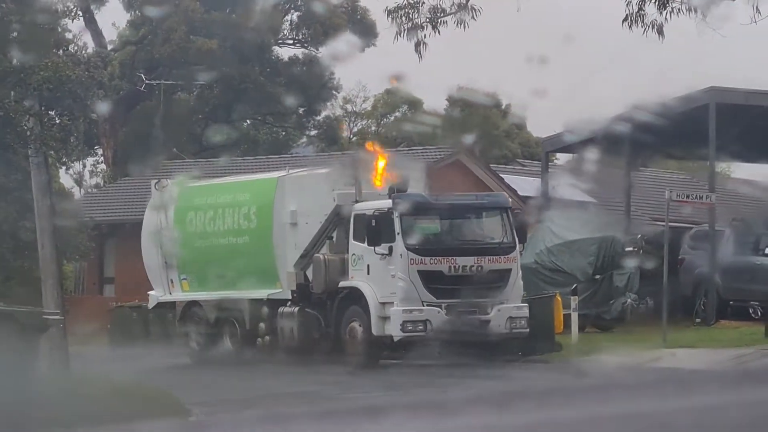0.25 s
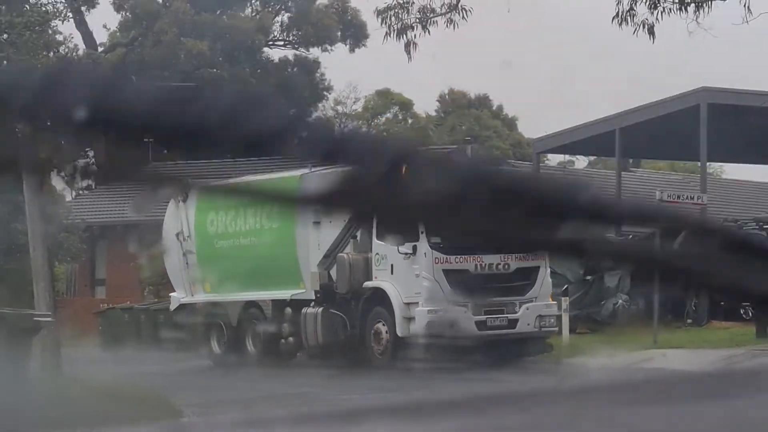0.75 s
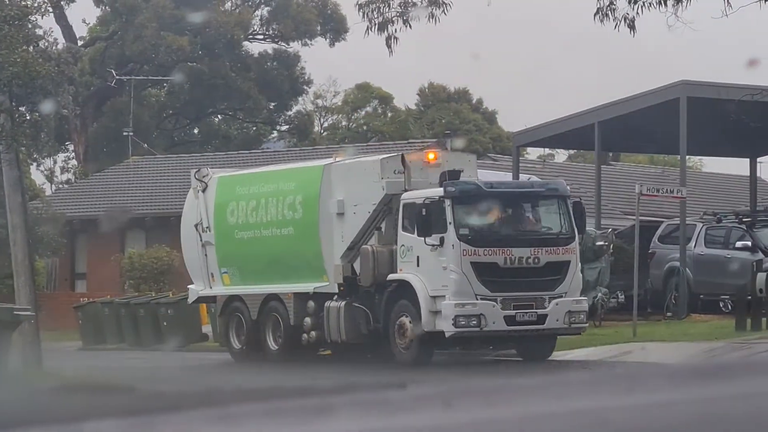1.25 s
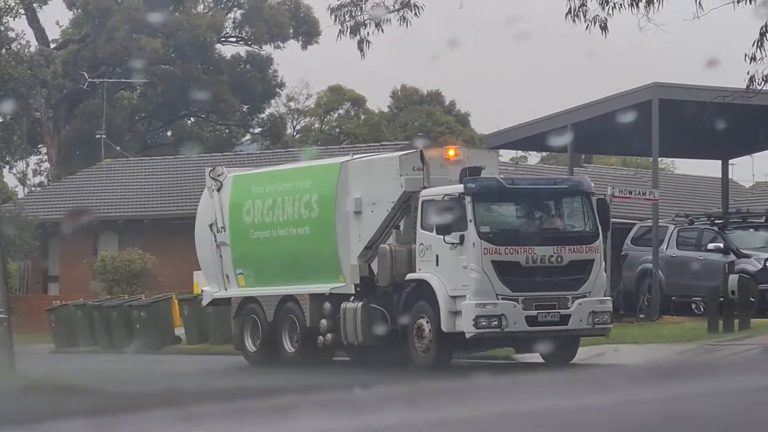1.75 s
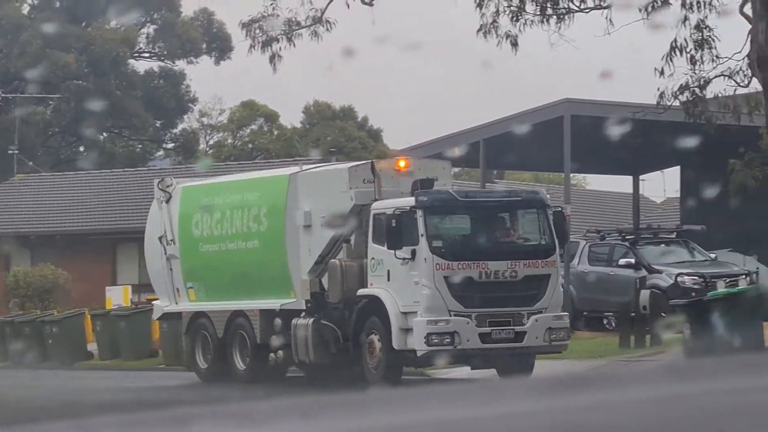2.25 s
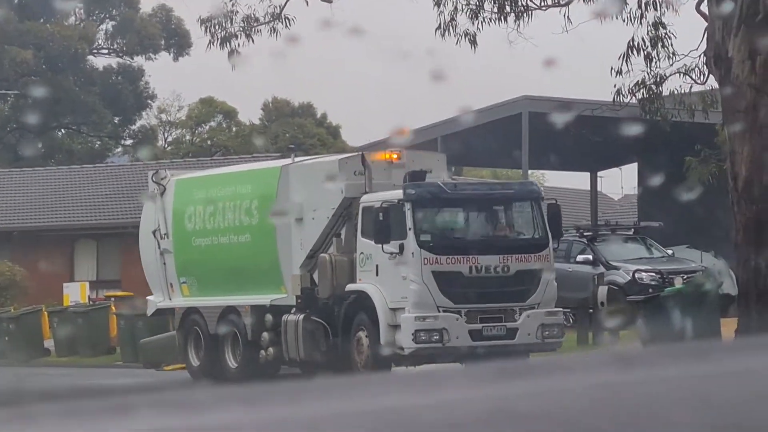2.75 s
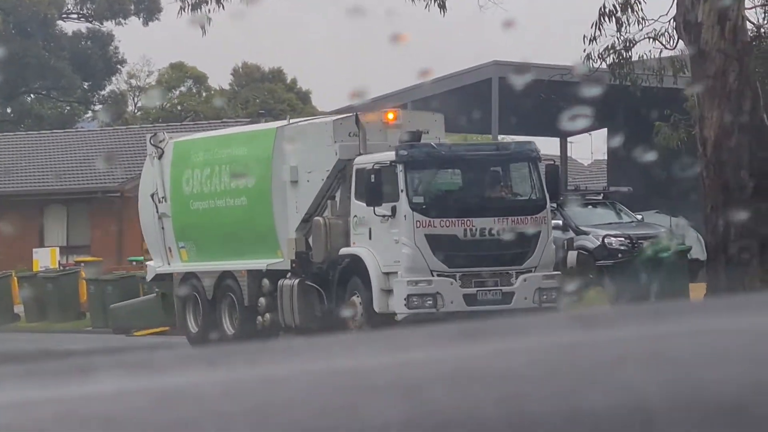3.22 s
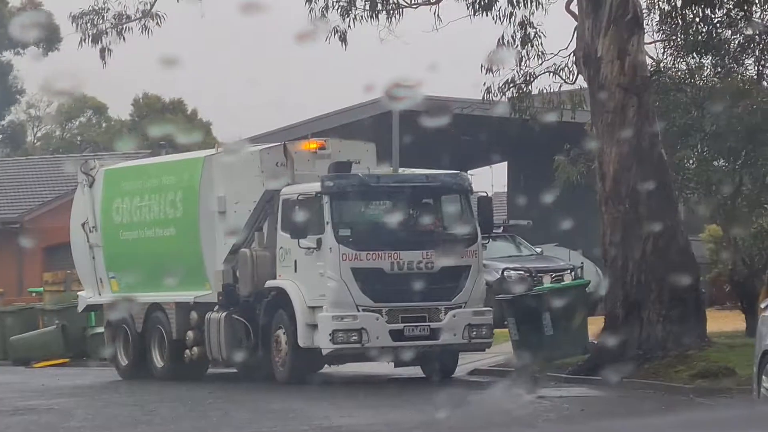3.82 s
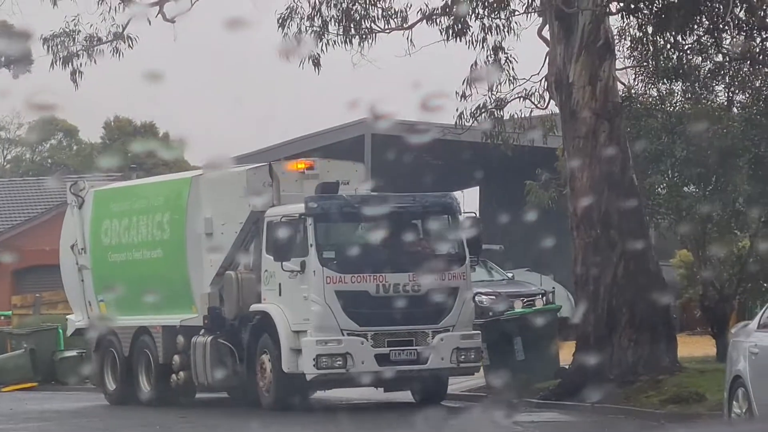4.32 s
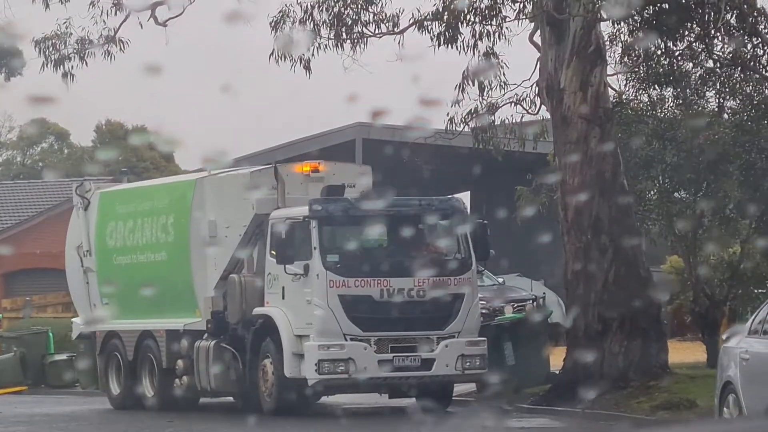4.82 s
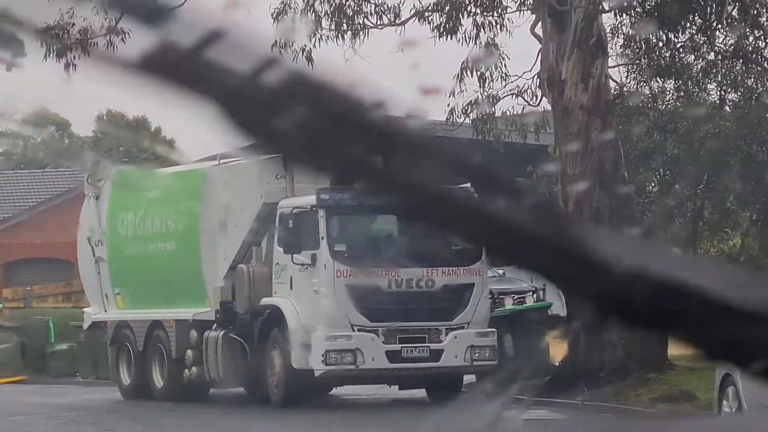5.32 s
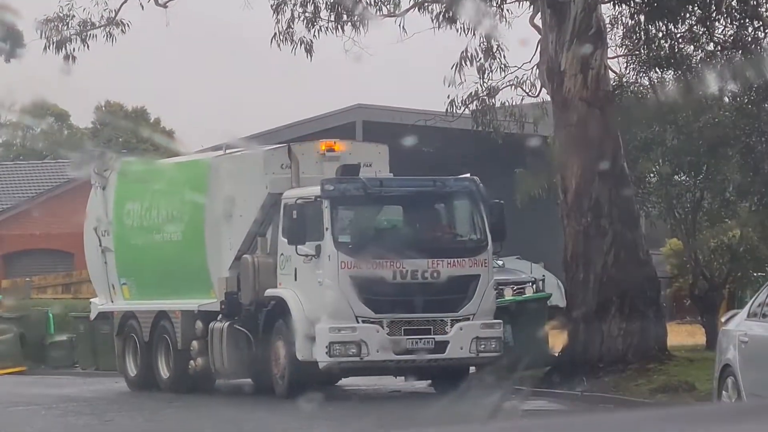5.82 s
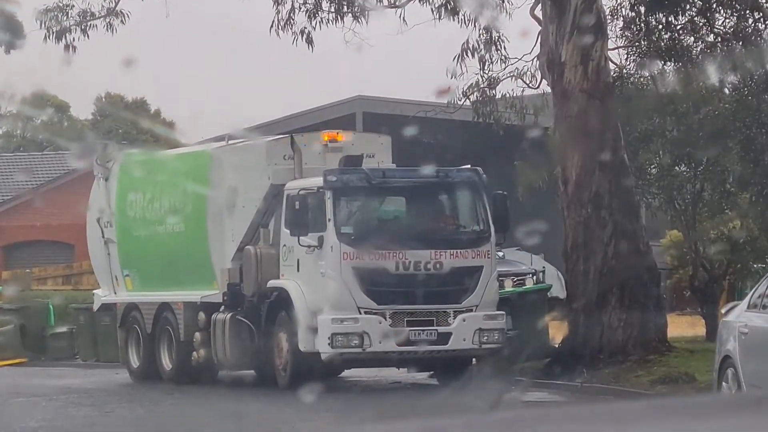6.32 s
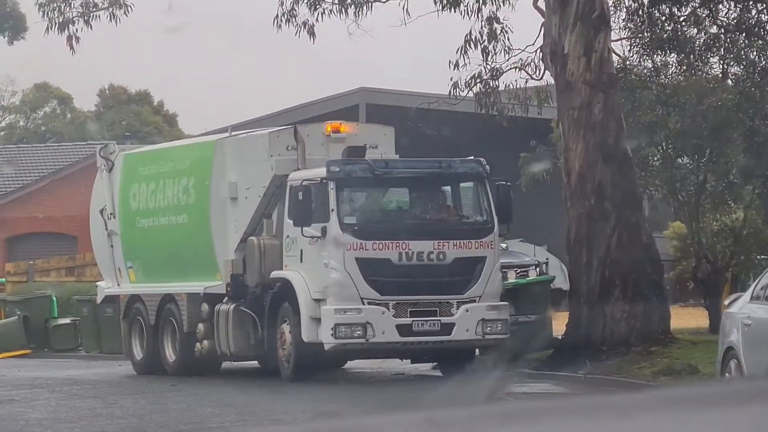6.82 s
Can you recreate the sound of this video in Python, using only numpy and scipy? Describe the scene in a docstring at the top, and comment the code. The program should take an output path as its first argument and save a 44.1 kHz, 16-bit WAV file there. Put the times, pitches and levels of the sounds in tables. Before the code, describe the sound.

Wet wiper rubber judders and groans across a windscreen twice, with dull thuds, over steady rain patter and low engine rumble inside a slowly creeping car.

```python
"""Two wiper sweeps judder, groan and rasp up the windscreen of a car creeping through steady rain.
The rubber sticks and slips, its lip sings gliding notes, and the blade frame rings; low thuds go with it.
After the first sweep the blade skips and glides back softly, as muffled filtered noise.
Rain is a grainy patter, hiss and ringing drops; engine and road are coloured noise, the brake faint sines.
Once, a plastic part clicks in the cabin: two decaying noise bursts through a few resonances."""
import sys
import numpy as np
from scipy import signal
from scipy.fft import rfft, irfft, next_fast_len
from scipy.io import wavfile
from scipy.ndimage import uniform_filter1d, map_coordinates

SR = 44100
rng = np.random.default_rng(int(sys.argv[2]) if len(sys.argv) > 2 else 0)


def store_wav(level_fs):
    """Save 16-bit WAV to argv[1]."""
    pcm = np.round(np.clip(np.atleast_2d(level_fs), -1, 1) * 32767)
    wavfile.write(sys.argv[1], SR, pcm.T.astype(np.int16))


N = 311346

# How alike left and right are in the open sound of the cabin. Each row: frequency in Hz, likeness (1 is mono).
CABIN_ALIKE = [(60, 1), (240, 0.89), (950, 0.29), (3770, -0.095)]
# Resonances of the blade frame. Each row: frequency in Hz, width in Hz, gain at the peak in dB.
FRAME_MODES = [(606, 25, 6.5), (737, 28, 7), (989, 35, 7.5), (1105, 24, 6.5), (1510, 96, 8),
               (1778, 17, 5.5), (2160, 22, 5), (3120, 76, 4)]
JUDDER_FALL_DB_PER_S, RASP_FALL_DB_PER_S = 328.5, 680  # how fast the rubber lets go


def amp(db):
    """Decibels to gain."""
    return 10 ** (np.asarray(db) / 20)


def unit(x):
    """Scale to rms 1."""
    return x / np.sqrt(np.mean(x ** 2) + 1e-20)


def along(points, hz):
    """Read (Hz, value) points on a logarithmic frequency axis."""
    f, v = np.transpose(points)
    return np.interp(np.log(hz + 1), np.log(f + 1), v)


def curves(rows):
    """One value per sample for each column after the time."""
    s, *cols = np.transpose(rows)
    return [np.interp(np.arange(N) / SR, s, c) for c in cols]


def gate(rows):
    """One while a table lasts, with soft edges."""
    t = np.arange(N) / SR
    inside = (t >= rows[0][0]) & (t <= rows[-1][0])
    return uniform_filter1d(1. * inside, size=400)


def wobble(rate):
    """A smooth random curve, rate knots a second."""
    knots = rng.standard_normal(int(N * rate / SR) + 4)
    return map_coordinates(knots, [np.arange(N) * rate / SR])


def filtered(x, response):
    """Filter x by a response given as a function of frequency in Hz."""
    m = next_fast_len(N + SR // 2)
    return irfft(rfft(x, m) * response(np.fft.rfftfreq(m, 1 / SR)), m)[..., :N]


def causal(spectrum):
    """Minimum-phase impulse response of (Hz, dB) points, energy 1."""
    size = 4096
    gain = amp(along(spectrum, np.fft.rfftfreq(size, 1 / SR)))
    cepstrum = irfft(np.log(gain + 1e-6))
    # fold the cepstrum forward in time
    cepstrum[1:size // 2] *= 2
    cepstrum[size // 2 + 1:] = 0
    h = irfft(np.exp(rfft(cepstrum)))
    return h / np.linalg.norm(h)


def colour(pair, spectrum, alike):
    """A pair of excitations becomes coloured stereo of rms 1, its width set by the likeness table."""
    body = signal.fftconvolve(pair, causal(spectrum)[None], axes=1)[:, :N]

    def mid_side_gains(hz):
        turn = np.arccos(np.clip(along(alike, hz), -1, 1)) / 2
        return np.array([np.cos(turn), np.sin(turn)])

    mid, side = filtered(body, mid_side_gains)
    return unit(np.array([mid + side, mid - side]))


def noise():
    """Two channels of white noise."""
    return rng.standard_normal((2, N))


def grains(rate, spread_db, t60):
    """Randomly timed tiny bursts of uneven size, rate a second, decaying 60 dB in t60 seconds."""
    hits = rng.random(N) < rate / SR
    sizes = hits * amp(spread_db * np.minimum(rng.exponential(size=N), 4))
    power = signal.lfilter([1], [1, -amp(-120 / (t60 * SR))], sizes ** 2)
    return unit(noise() * np.sqrt(power))


def pan(db):
    """Left and right gains for a left-minus-right level difference."""
    return amp(np.array([[db], [-db]]) / 2)


def add(track, s, sound):
    """Mix a sound in at time s."""
    part = track[..., max(round(s * SR), 0):][..., :sound.shape[-1]]
    part += sound[..., :part.shape[-1]]


def swell(s, db, length):
    """A bell-shaped rise and fall around time s, down to 1/e at length seconds either side."""
    return amp(db) * np.exp(-((np.arange(N) / SR - s) / length) ** 2)


def burst(s, hold, db, fall_db_per_s):
    """A quick attack up to time s, a hold, then an even fall in dB."""
    attack_s = 0.014
    t = np.arange(N) / SR - s
    attack = np.clip(1 + t / attack_s, 0, 1)
    return attack * amp(db - np.clip(fall_db_per_s * (t - hold), 0, 200))


def ringing(x, resonances):
    """A part passes everything and rings at a few resonances."""
    def response(hz):
        total = 1
        for centre, width, db in resonances:
            damping = 1j * hz * width
            total = total + (amp(db) - 1) * damping / (centre * centre - hz * hz + damping)
        return total

    return filtered(x, response)


def grip(fall_db_per_s, axis):
    """Envelope of all the rubber's grabs at the glass for one level column; the strongest rules."""
    # Each row: start in seconds, hold in seconds, judder in dB, rasp in dB, both before the frame rings.
    grabs = [(0.002, 0.04, -20, -23.5), (0.052, .05, -20, -23), (0.154, 0.011, -17.5, -31),
             (0.244, .012, -32, -46), (5.033, 0.045, -41, -67.5), (5.109, 0.13, -17.5, -35.5),
             (5.262, .028, -22, -39.5), (5.314, 0.04, -19.5, -35), (5.418, 0.012, -21.5, -31.5),
             (5.49, 0.0094, -21, -33.5), (5.571, 0.028, -33, -43), (5.634, 0.11, -30, -39),
             (5.735, 0.096, -22, -26.5), (5.855, .045, -20, -26.5), (5.94, 0.024, -22, -40.5),
             (6.036, 0.01, -35, -60)]
    return np.max([burst(row[0], row[1], row[axis], fall_db_per_s) for row in grabs], axis=0)


def slips(rate, scatter, size_db, t60, grit):
    """Stick-slip: each release is a kick followed by a short scuff."""
    turns = np.cumsum(rate * np.exp(scatter * wobble(120))) / SR
    kicks = np.diff(np.floor(turns), prepend=0) * amp(size_db * rng.random(N))
    decay = signal.lfilter([1], [1, -amp(-60 / (t60 * SR))], kicks)
    return grit * unit(noise() * decay) + unit(kicks)


def blade():
    """Rubber judders on the glass and rasps where it grips hardest; both set the blade frame ringing."""
    # Tone of the juddering rubber. Each row: frequency in Hz, level in dB.
    rubber_tone = [(50, -19.5), (100, 5), (150, -14), (183, 0.5), (220, -4.5), (290, -4), (380, -9),
                   (900, -25.5), (1400, -32.5), (3000, -77)]
    # Tone of the rasp. Each row: frequency in Hz, level in dB.
    rasp_tone = [(400, -7), (750, -2), (1600, -4.5), (2100, -10.5), (3100, -11.5), (4300, -24), (5400, -20),
                 (8000, -40), (14000, -61)]
    # Left-right likeness of the blade. Each row: frequency in Hz, likeness (1 is mono).
    blade_alike = [(100, 1), (300, 0.92), (600, 0.45), (1100, 0.028)]
    # Which side the rasp leans to. Each row: frequency in Hz, left minus right in dB.
    rasp_lean = [(1300, -1.5), (2400, -5.5), (4400, -9.5)]
    judder = slips(rate=105, scatter=.4, size_db=3.5, t60=0.069, grit=1.87)
    judder = colour(judder, rubber_tone, blade_alike)
    rasp = slips(rate=250, scatter=.25, size_db=3, t60=.02, grit=1.1)
    rasp = colour(rasp, rasp_tone, blade_alike)
    rasp = filtered(rasp, lambda hz: pan(along(rasp_lean, hz))[:, 0])
    rasp = amp(-4) * unit(rasp * amp(wobble(110)))  # an unsteady level
    gripped = grip(JUDDER_FALL_DB_PER_S, axis=2) * judder
    gripped = gripped + grip(RASP_FALL_DB_PER_S, axis=3) * rasp
    return ringing(gripped, FRAME_MODES)


def groan(count=11):
    """The rubber lip locks into gliding notes; a harder grip brings out overtones that ring the frame."""
    # Each row: start in seconds, length in seconds, starting pitch in Hz, glide in Hz per second, level in dB.
    groans = [(0, .11, 276.8, 199, -17.5), (5.143, 0.043, 334, 0, -20.5), (5.389, 0.079, 379, -100, -29.5),
              (5.481, 0.024, 302, 405, -18), (5.519, 0.046, 413, -700, -29.5),
              (5.561, 0.067, 328, -480, -23.5), (5.631, .08, 305.4, 329, -22.5),
              (5.722, .19, 262.1, -90, -24), (5.635, .07, 850, -150, -34.5),
              (5.679, 0.027, 537, 1597, -26.5)]
    edge_s, pitch_waver, flutter_db = 0.018, 0.0094, 1.5  # rise and fall of a note; its unsteadiness
    overtone_db, fall_db_per_octave = -10, 4.5  # the first overtone against the grip; the fall above it
    right_lead_s = 0.00017  # the sound reaches the right microphone first
    notes, overtones = np.zeros((2, 2, N))
    t = np.arange(N) / SR
    pressure = grip(RASP_FALL_DB_PER_S, axis=3)
    for s, length, start_hz, glide, db in groans:
        shape = np.clip(.5 + np.minimum(t - s, s + length - t) / edge_s, 0, 1)
        on = shape > 0
        hz = start_hz + glide * np.clip(t[on] - s, 0, length)
        hz = hz * (1 + pitch_waver * wobble(110)[on])
        phase = 2 * np.pi * (np.cumsum(hz) / SR + np.array([[0], [right_lead_s]]) * hz)
        level = shape[on] * amp(flutter_db * wobble(70)[on])
        notes[:, on] += level * amp(db) * np.sin(phase)
        for k in range(2, count + 1):
            below_top_mode = k * hz < FRAME_MODES[-1][0]
            partial = np.sin(k * phase + 2 * np.pi * rng.random()) * below_top_mode
            overtones[:, on] += level * amp(overtone_db - fall_db_per_octave * np.log2(k / 2)) * partial
    return notes + ringing(pressure * overtones, FRAME_MODES)


def rain():
    """A patter of far drops, wet hiss, and near drops that ring two modes of the glass and splash."""
    # Level of the steady rain. Each row: time in seconds, level in dB.
    wetness = [(0, -54), (2, -56), (3, -54), (5.5, -57), (6.1, -59), (7, -57)]
    # Tone of the rain. Each row: frequency in Hz, level in dB.
    rain_tone = [(600, -2.5), (2300, -6), (2900, 3), (3600, -2.5), (4400, -7.5), (4900, -3), (6600, -5.5),
                 (7600, -15.5), (10000, -17.5), (15800, -27.5)]
    # Thin swells of wet hiss. Each row: middle in seconds, level in dB, half length in seconds.
    sprays = [(1.9, -59, 0.037), (3.21, -59.5, 0.07)]
    # Near drops. Each row: start in seconds, level in dB before a 7 dB cut, ring in Hz,
    # splash in dB against that level before a further 6 dB cut.
    drops = [(0.504, -27.5, 556, -13.5), (0.974, -37, 1050, -3), (1.012, -39.5, 2540, -26),
             (1.756, -27, 743, -23.5), (1.995, -38.5, 486, -30), (2.874, -37.5, 543, -9.5),
             (3.134, -39, 1870, -21), (4.125, -38, 1030, -33), (4.445, -37.5, 1627, -30),
             (4.767, -39.5, 740, -26), (6.765, -40, 1080, -3.5), (6.946, -35, 730, -18)]
    patter = colour(grains(rate=220, spread_db=5.0, t60=0.063) + noise(), rain_tone, CABIN_ALIKE)
    out = amp(curves(wetness)[0]) * patter * pan(-3.5)  # leans right
    hiss = unit(filtered(noise(), lambda hz: (hz / (hz + 8000)) ** 2))
    out += sum(swell(*row) for row in sprays) * hiss
    t = np.arange(SR // 6) / SR
    for s, db, hz, splash_db in drops:
        white = rng.standard_normal((2, 2, len(t)))
        pane = causal([(200, -3), (hz, 0), (hz + 2600, -14), (hz + 7000, -34)])
        tap = signal.fftconvolve(white[0] * amp(-60 * t / 0.12), pane[None], axes=1)[:, :len(t)]
        modes = np.sin(2 * np.pi * hz * t) + .5 * np.sin(2 * np.pi * 1.72 * hz * t)
        ring = amp(3.5 - 60 * t / 0.042) * modes
        splash = signal.lfilter([1, 1, -1, -1], [1], white[1])
        splash = splash * amp(splash_db - 6.0 - 60 * t / 0.062)
        attack = 1 - np.exp(-t / 0.00092)
        add(out, s, amp(db - 7.0) * attack * (tap + ring + splash))
    return out


def tone(hz, drift):
    """A sine whose pitch drifts slightly."""
    return np.sin(2 * np.pi * np.cumsum(hz * (1 + drift * wobble(9))) / SR)


def car():
    """Engine and body rumble, road noise, a faint hum, and brake pads that hiss before they sing."""
    # Rumble, swelling as the wipers shake the body. Each row: time in seconds, level in dB.
    rumble_level = [(.16, -18.5), (.5, -37), (5.07, -39.5), (5.19, -20.5), (5.6, -30.5), (5.9, -23.5),
                    (6.35, -27), (6.48, -36.5)]
    # Tone of the rumble. Each row: frequency in Hz, level in dB.
    rumble_tone = [(20, -25), (38, -2), (52, 0), (70, -4.5), (200, -28.5), (400, -75.5)]
    # Tone of the road noise. Each row: frequency in Hz, level in dB.
    road_tone = [(80, -0.5), (130, -6.5), (210, -4), (280, -1), (390, -9.5), (460, -5), (700, -9),
                 (2400, -19.5), (4000, -59.5)]
    # Faint brake squeals. Each row: middle in seconds, level in dB, half length in seconds, pitch in Hz.
    squeals = [(4.97, -53.5, 0.077, 6702), (6.0, -63, 0.3, 6690), (5.95, -64, 0.2, 7570),
               (5.0, -69, .07, 10980)]
    # Hiss of the brake pads: middle in seconds, level in dB, half length in seconds.
    pad_hiss = (3.91, -63, 0.16)
    hiss_hz, hiss_width_hz = (6450, 9600), 370  # two bands
    right_lag_s = .00036  # the rumble reaches the left microphone first
    low = colour(noise(), rumble_tone, CABIN_ALIKE).mean(axis=0)
    low = filtered(low, lambda hz: np.exp(-2j * np.pi * hz * np.array([[0], [right_lag_s]])))
    rumble = amp(curves(rumble_level)[0]) * low
    gravelly = noise() + .5 * grains(rate=76, spread_db=3.0, t60=0.051)
    road = amp(-51 + wobble(3.9)) * colour(gravelly, road_tone, CABIN_ALIKE)
    hum = amp(-65.5) * tone(361, 0.0023)
    brake = sum(swell(s, db, length) * tone(hz, .001) for s, db, length, hz in squeals)
    brake = brake * amp(3 * wobble(37))  # an unsteady level

    def hiss_bands(hz):
        return sum(np.exp(-((hz - c) / hiss_width_hz) ** 2) / c ** 2 for c in hiss_hz)

    rub = swell(*pad_hiss) * unit(filtered(noise(), hiss_bands))
    return rumble + road + hum + brake + rub


def thuds():
    """Jolts of the arm set the windscreen booming: decaying low sines."""
    # Knocks of linkage, blade and trim through the body. Each row: start in seconds,
    # level in dB before attack and decay, pitch in Hz, time to fall 60 dB in seconds.
    knocks = [(0.056, -13.5, 95.8, 0.45), (.117, -8.5, 98, 0.18), (0.156, -3, 71, 0.15),
              (0.25, -15.5, 70.5, 0.56), (.96, -17.5, 84.4, 0.16), (0.99, -14, 127, .08),
              (1.126, -12.5, 133, 0.032), (2.21, -24.5, 41.9, 0.83), (5.322, -6.5, 150, 0.13),
              (5.403, -13, 104, 0.1), (5.756, -5, 91.7, 0.36), (5.85, -7.5, 92.3, 0.45),
              (5.943, -1, 69.5, 0.14), (6.768, -18, 128.6, 0.091)]
    out, t = np.zeros(N), np.arange(SR // 2) / SR
    attack = 1 - np.exp(-t / 0.0042)
    for s, db, hz, t60 in knocks:
        add(out, s, amp(db - 60 * t / t60) * attack * np.sin(2 * np.pi * hz * t))
    return out


def swishes(count=4):
    """Muffled rubbing: the returning blade skips, then glides; tyres cross rough asphalt."""
    # First return stroke, the blade gliding over wet glass. Each row: time in seconds, level in dB.
    return_stroke = [(.3, -61), (.52, -40), (.75, -39), (.92, -49), (1.08, -38), (1.2, -48.5)]
    # Tone of the rubbing. Each row: frequency in Hz, level in dB.
    muffled_tone = [(70, -2), (180, 4.5), (300, -17.5), (500, -8.5), (1100, -21), (3000, -39),
                    (9000, -82.5)]
    # Tyres over a rough patch: middle in seconds, level in dB, half length in seconds.
    rough_patch = (2.623, -39, 0.18)
    skip_start_s, skip_gap_s = 0.382, 0.0634  # it skips evenly as it sets off
    skips = sum(burst(skip_start_s + k * skip_gap_s, hold=0.0074, db=-34.5, fall_db_per_s=648)
                for k in range(count))
    gliding = gate(return_stroke) * amp(curves(return_stroke)[0])
    level = skips + gliding + swell(*rough_patch)
    return level * amp(2 * wobble(70)) * colour(noise(), muffled_tone, CABIN_ALIKE)


def click():
    """A plastic part snaps and bounces; the cabin rings briefly."""
    # Snap and bounce. Each row: start in seconds, level in dB before a 6 dB lift.
    snaps = [(2.2084, -26.5), (2.2113, -26.5)]
    # Tone of the hard plastic. Each row: frequency in Hz, level in dB.
    plastic_tone = [(100, 6), (300, -4.5), (750, -16), (1250, -10), (2200, -19), (4100, -20), (5100, -13),
                    (11000, -22.5), (15500, -20.5)]
    # Resonances of the plastic part. Each row: frequency in Hz, width in Hz, gain at the peak in dB.
    plastic_modes = [(248, 25, 7.5), (5000, 38, 11.5), (6170, 34, 9.5)]
    drive, t = np.zeros((2, N)), np.arange(SR // 3) / SR
    fade = amp(-60 * t / 0.018) + amp(-11.5 - 60 * t / 0.3)  # the snap, then the cabin
    for s, db in snaps:
        add(drive, s, amp(db + 6.0) * fade * rng.standard_normal((2, len(t))))
    snap = signal.fftconvolve(drive, causal(plastic_tone)[None], axes=1)[:, :N]
    snap = ringing(snap, plastic_modes)
    # its low knock reaches both microphones alike
    snap += filtered(snap[::-1] - snap, lambda hz: .5 / (1 + (hz / 500) ** 2))
    # the body of the click leans right, its sharpest edge left
    half_lean_db = [(8000, -0.62), (13000, 1.5)]
    return filtered(snap, lambda hz: amp(np.array([[1], [-1]]) * along(half_lean_db, hz)))


def scene():
    """Everything as heard from the front seat."""
    return blade() + groan() + rain() + car() + thuds() + swishes() + click()


def record(dry):
    """The right microphone is a little more sensitive; deepest bass and all above the band limit are lost."""
    bottom_hz, top_hz = 30, 15800
    return filtered(dry * pan(-0.55), lambda hz: (hz < top_hz) * hz ** 6 / (hz ** 6 + bottom_hz ** 6))


dry = scene()
out = record(dry)
store_wav(out)
```